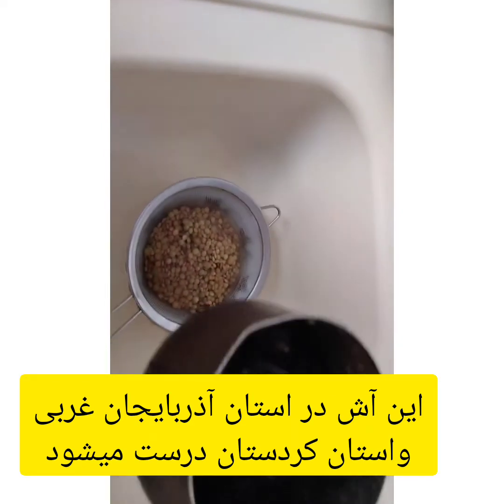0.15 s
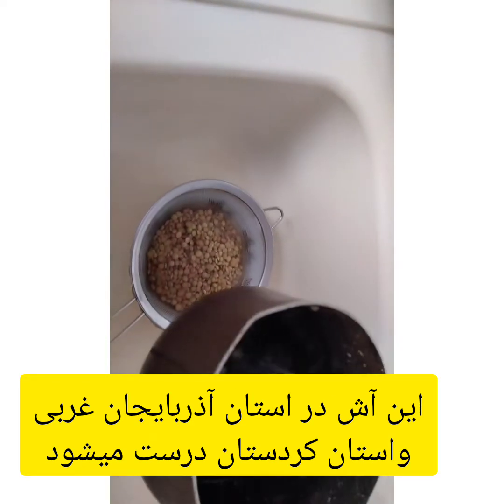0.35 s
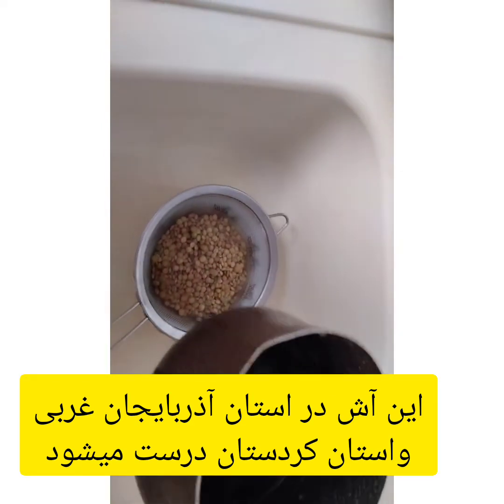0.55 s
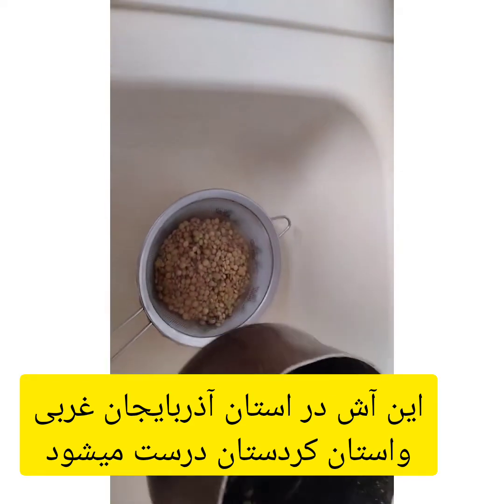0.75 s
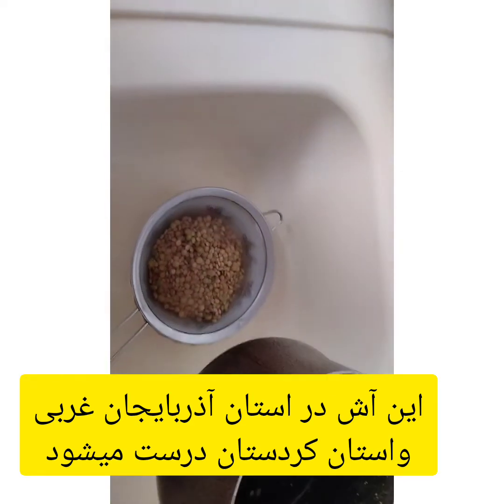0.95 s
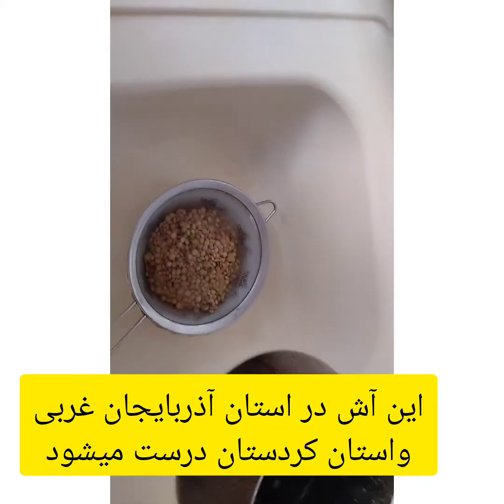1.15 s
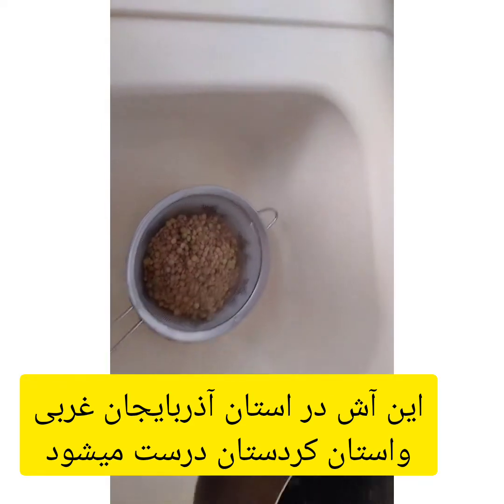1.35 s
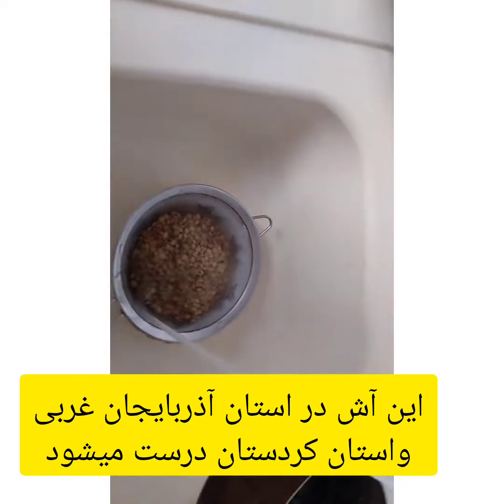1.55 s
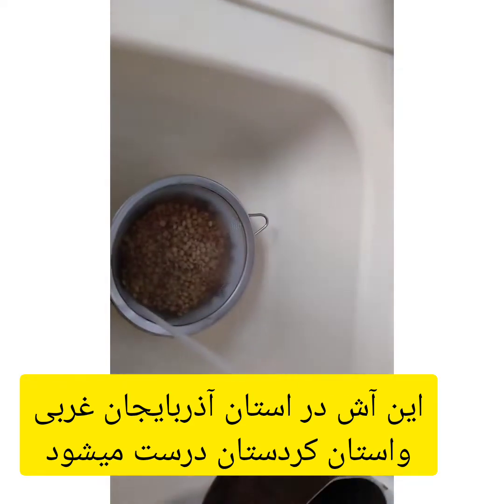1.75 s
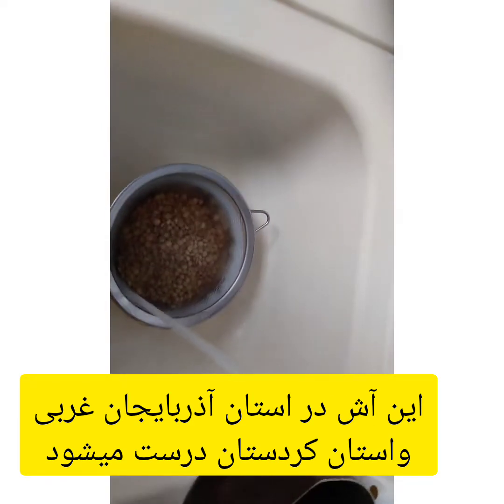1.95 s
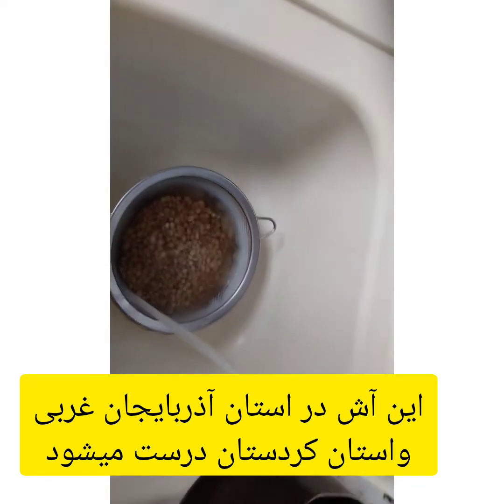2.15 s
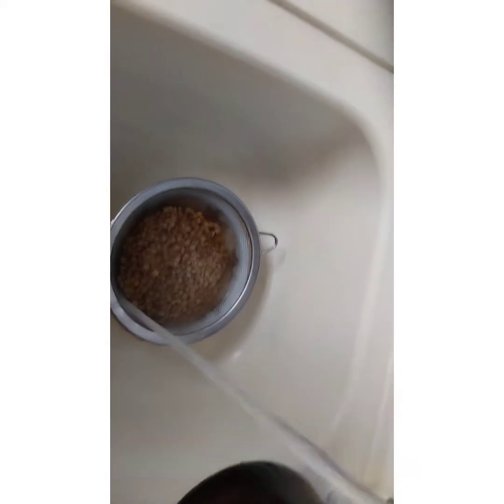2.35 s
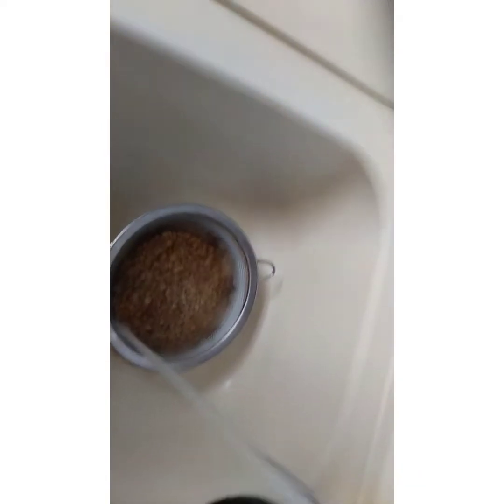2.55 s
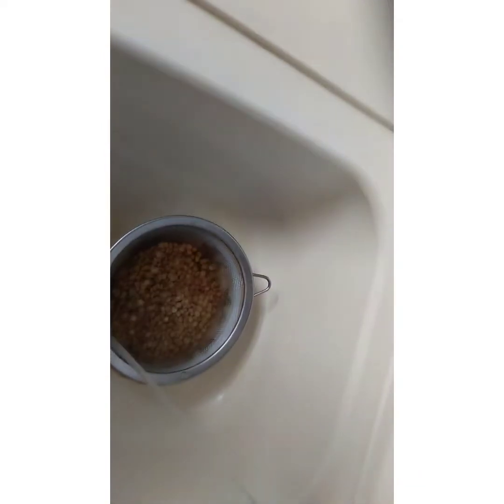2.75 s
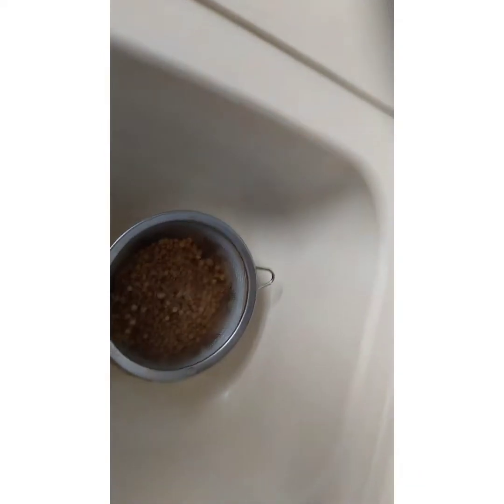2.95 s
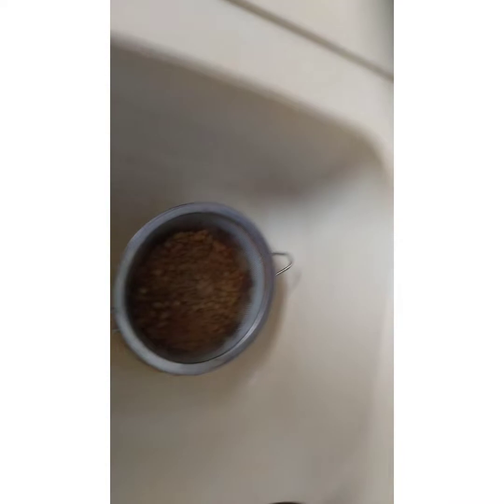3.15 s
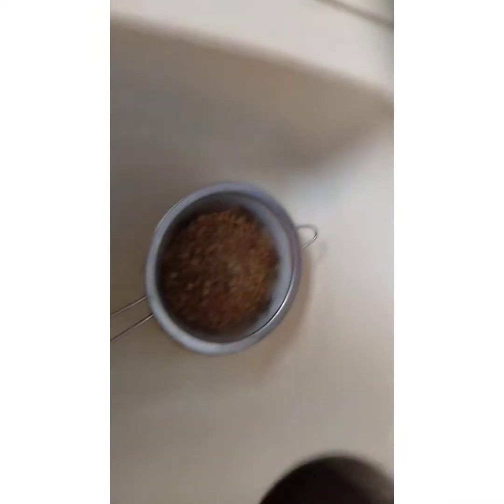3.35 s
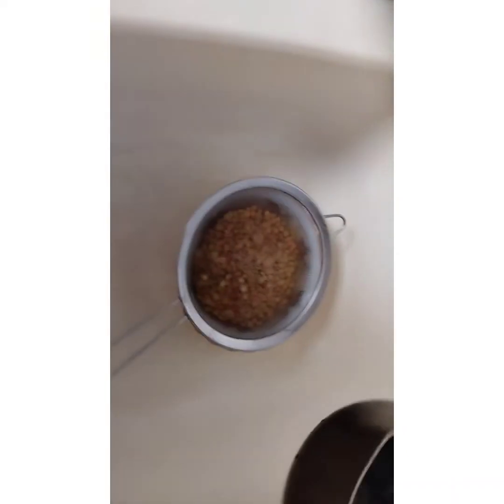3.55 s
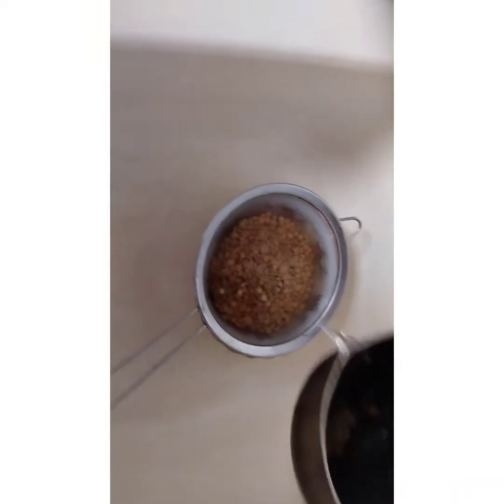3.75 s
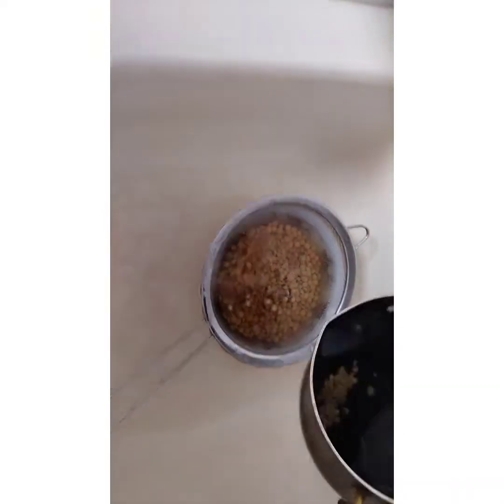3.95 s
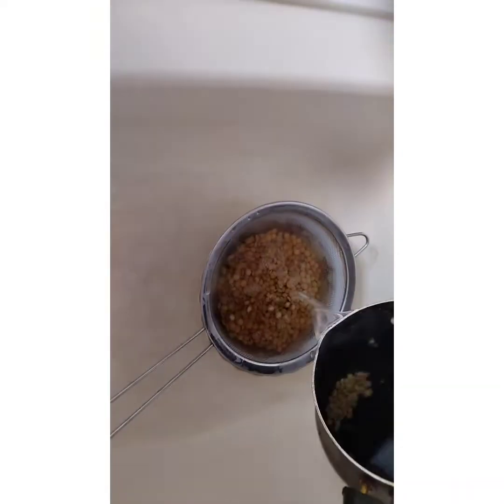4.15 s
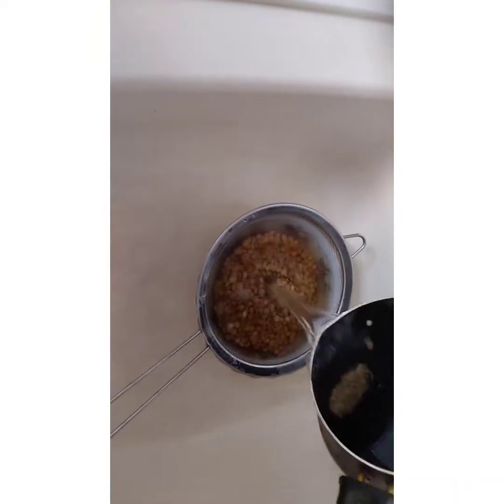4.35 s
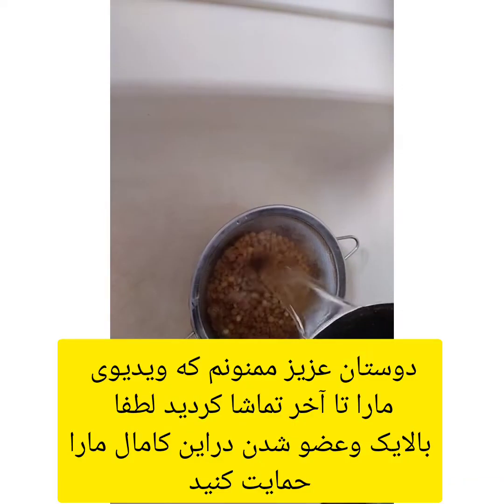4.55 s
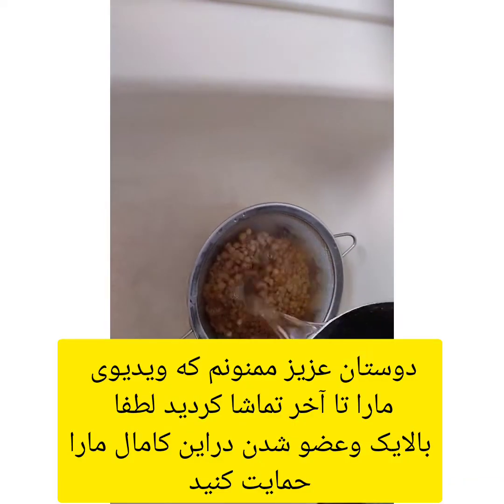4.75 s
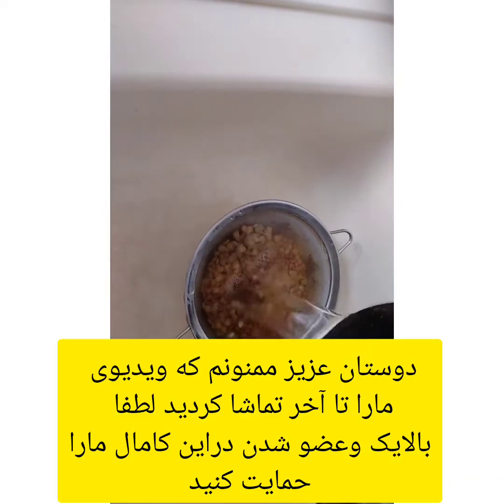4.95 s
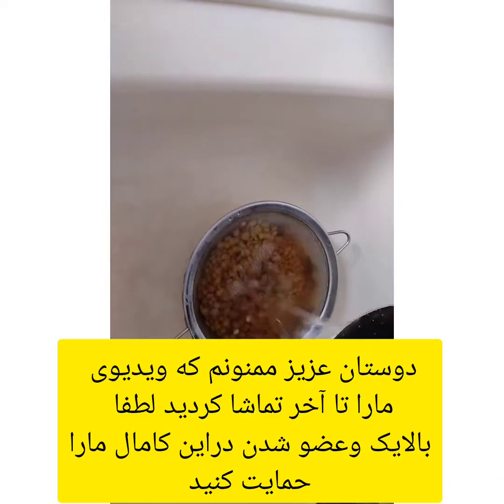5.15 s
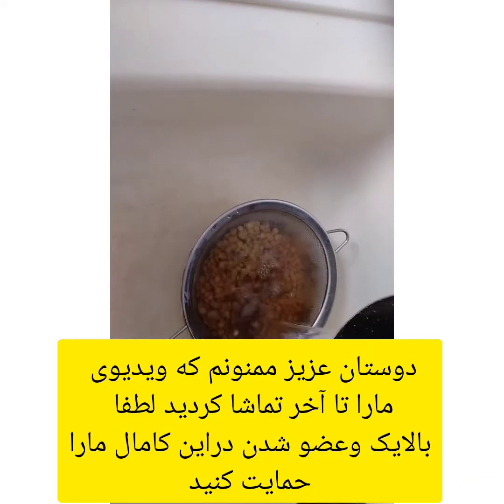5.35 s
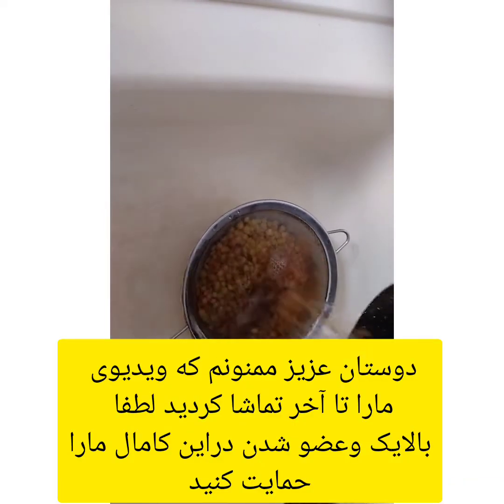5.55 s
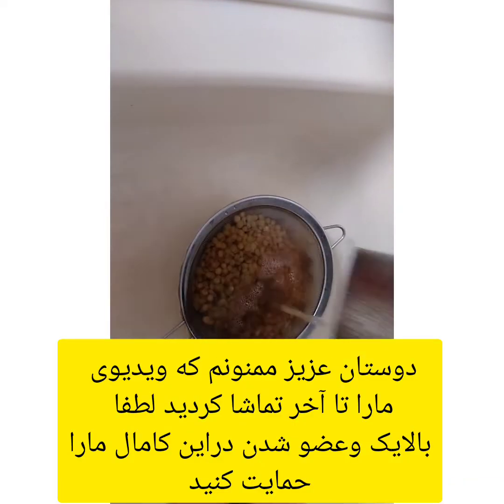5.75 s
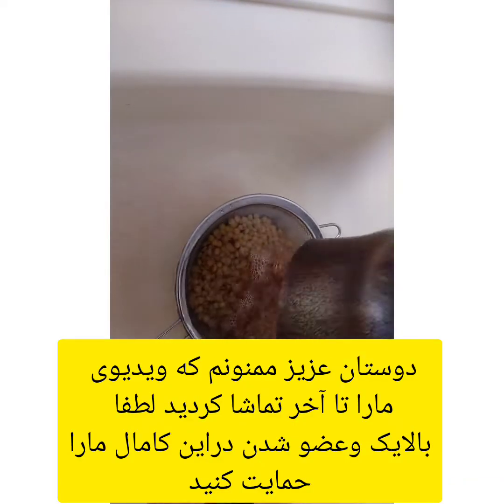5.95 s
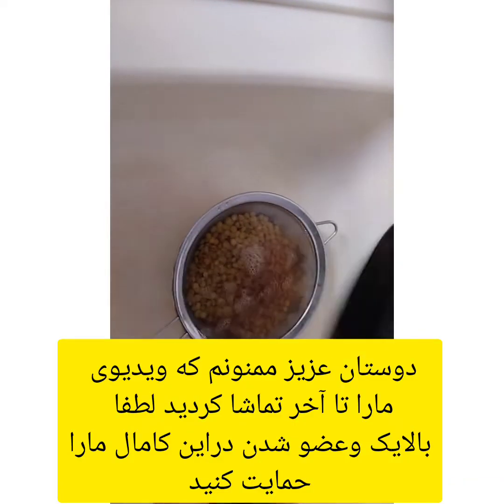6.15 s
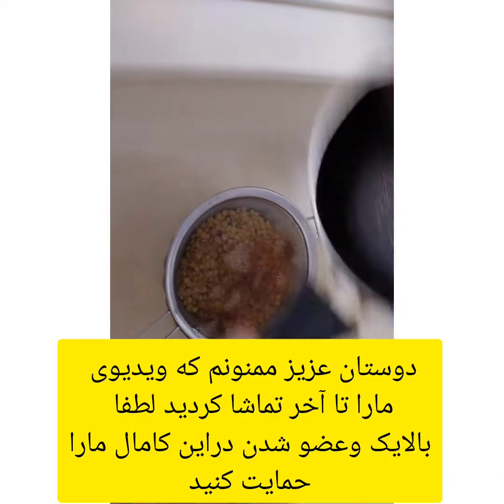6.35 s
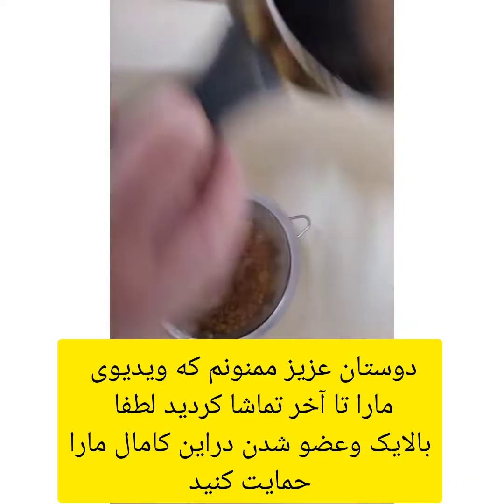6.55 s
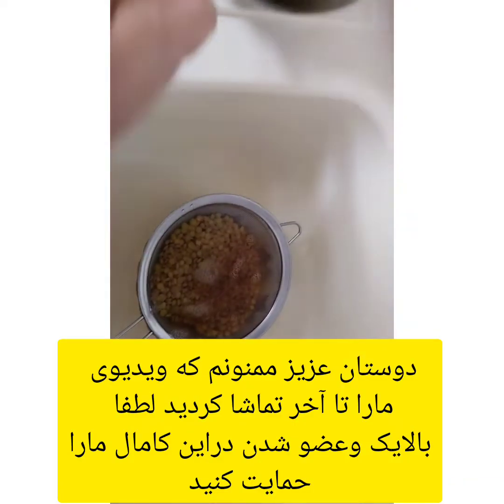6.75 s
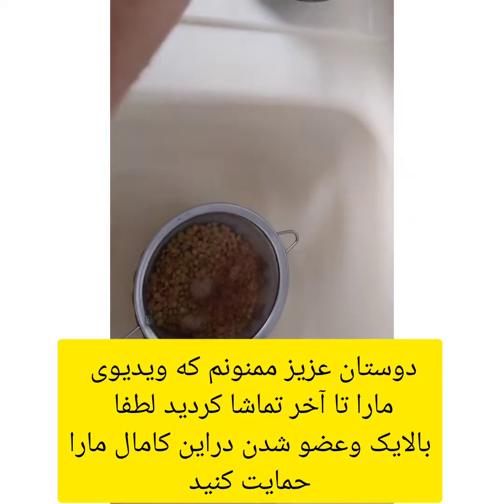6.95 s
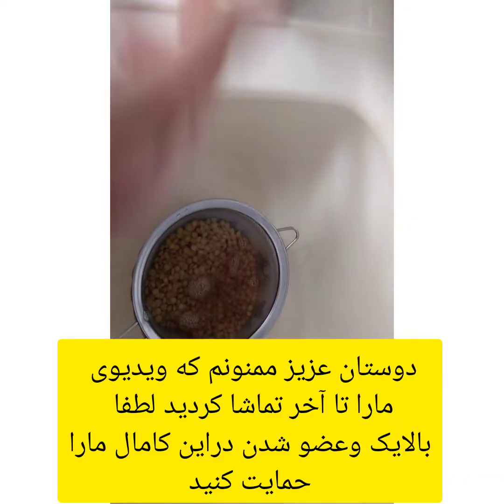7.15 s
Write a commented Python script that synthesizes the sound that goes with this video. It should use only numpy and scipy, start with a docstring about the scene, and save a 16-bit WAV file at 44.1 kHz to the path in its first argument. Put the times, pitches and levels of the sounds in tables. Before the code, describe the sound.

Close mono pickup at a kitchen sink: a running tap fills a metal pot, its fizz fading, then the stream hits the basin as a louder bright hiss with thumps. It cuts off abruptly. A light metallic touch follows, then water patters and trickles over lentils in a strainer, swelling twice with spurts and gulps. The pot lands with a sharp clang; soft thuds end it, fan noise throughout.

```python
"""Tap water is the main source: it fills a small metal pot, then spatters on the floor of a kitchen sink
while the basin is bumped, and is shut off. The pot touches a wire strainer, is emptied over lentils in two
surges, with drips, spurts and gulps, and is set down with a clang. A fan hums throughout. Water is clumped
bursts and rising chirps, metal is ringing modes, contacts are short noise bursts. The place is a basin with
walls a few tenths of a metre apart in a small, hard kitchen; one microphone channel."""
import sys
import numpy as np
from scipy import signal
from scipy.fft import rfft, irfft
from scipy.io import wavfile

SR = 44100
rng = np.random.default_rng(int(sys.argv[2]) if len(sys.argv) > 2 else 0)


def to_wav(s):
    """Save 16-bit WAV."""
    ch = np.atleast_2d(s).T  # columns
    pcm = np.round(np.clip(ch, -1, 1) * 32767)  # PCM
    wavfile.write(sys.argv[1], SR, pcm.astype(np.int16))


N = 321048
TIME = np.arange(N) / SR   # s


def from_db(db):
    """Decibels to gain."""
    return 10 ** (np.asarray(db) / 20)


def rms_one(x):
    """Scale to unit power."""
    return x / np.sqrt(np.mean(x ** 2) + 1e-20)


def between(start, stop, fade):
    """Open from start to stop, with sloping edges (all in s)."""
    opening = np.clip((TIME - start) / fade + .5, 0, 1)
    closing = np.clip((stop - TIME) / fade + .5, 0, 1)
    return opening * closing


def at_hz(points, hz):
    """Read a table on a log-frequency axis."""
    table = np.array(points)
    return np.interp(np.log(hz), np.log(table[:, 0]), table[:, 1])


def drift(rate):
    """Slow chance with spread 1: noise through two one-pole low-passes at this rate in Hz."""
    step = 20   # computed at every 20th sample, then interpolated
    r = np.exp(-2 * np.pi * rate * step / SR)
    noise = rng.standard_normal(N // step + 2002)
    slow = signal.lfilter([1], [1, -2 * r, r * r], noise)[2000:]   # skip the run-in
    return np.interp(np.arange(N) / step, np.arange(len(slow)), rms_one(slow))


def white():
    """White noise."""
    return rng.standard_normal(N)


def coloured(spectrum, source):
    """Give a source this spectrum, falling steeply beyond its ends; rms 1."""
    hz = np.fft.rfftfreq(N, 1 / SR) + 1
    low_end = np.minimum(hz / spectrum[0][0], 1) ** 3
    high_end = np.minimum(spectrum[-1][0] / hz, 1) ** 3
    gain = from_db(at_hz(spectrum, hz)) * low_end * high_end
    return rms_one(irfft(rfft(source()) * gain, N))


def ring(x, hz, t60):
    """A unit click sets a sine of height 1 ringing; it falls 60 dB in t60 s."""
    r = from_db(-60 / (t60 * SR))
    w = 2 * np.pi * hz / SR
    return signal.lfilter([0, np.sin(w)], [1, -2 * r * np.cos(w), r * r], x + 1e-18)


def add(track, s, sound):
    """Mix a short sound in at time s."""
    i = round(s * SR)
    track[i:i + len(sound)] += sound[:N - i]


# edges of third-octave bands: f/Hz
BAND_EDGES = np.geomspace(22, 17000, 30)


def bands(low_hz, high_hz):
    """Third-octave filters that overlap a range."""
    return [signal.butter(2, [a, b], "band", fs=SR, output="sos")
            for a, b in zip(BAND_EDGES, BAND_EDGES[1:]) if b > low_hz and a < high_hz]


def spatter(spectrum, per_s, size_db, clump_db, clump_hz, mist):
    """Tiny bursts, per_s in each band, come in clumps over a mist too fine to count; rms 1."""
    def bursts():
        out = 0
        for sos in bands(spectrum[0][0], spectrum[-1][0]):
            draw = rng.uniform(-1, 1, N) * SR / per_s
            born = np.flatnonzero(np.abs(draw) < 1)
            # many small bursts, few large ones
            size = from_db(-size_db * np.log(np.abs(draw[born]) + .02))
            clicks = np.zeros(N)
            clicks[born] = np.sign(draw[born]) * size
            out = out + signal.sosfilt(sos, rms_one(clicks) + 1e-9)
        return out + mist * white()
    return rms_one(coloured(spectrum, bursts) * from_db(clump_db * drift(clump_hz)))


def chirp(hz, t60, rise):
    """A dying sine that goes up in pitch, as a bubble does when it nears the surface."""
    t = TIME[:SR // 10]
    own_hz = hz * (1 + rise * np.minimum(t / t60, 1))
    phase = 2 * np.pi * np.cumsum(own_hz) / SR
    onset = 1 - np.exp(-t * hz)
    return np.sin(phase) * from_db(-60 * t / t60) * onset


def trickle(count, low_hz, high_hz, size_db, cycles):
    """Small bubbles of random pitch ring and rise; rms 1."""
    out = np.zeros(N)
    for when, pitch, size in rng.random((count, 3)):
        hz = low_hz * (high_hz / low_hz) ** pitch
        gain = from_db(size_db * size ** 2)
        add(out, when * TIME[-1], gain * chirp(hz, cycles / hz, rise=0.1))
    return rms_one(out)


def struck(blows, modes):
    """Blows ring the modes of a body; a soft contact misses the high ones."""
    s, blow_db, corner_hz = np.transpose(blows)
    out = np.zeros(N)
    for k, (hz, mode_db, t60) in enumerate(modes):
        clicks = np.zeros(N)
        softness = 1 + (hz / corner_hz) ** 2
        clicks[np.round(s * SR).astype(int)] = from_db(blow_db + mode_db) / softness
        out += ring(clicks, hz, t60) * (-1) ** k   # neighbouring modes in opposite phase
    return out


def thuds(blows, spectrum, decay_s):
    """Each contact sets off a burst of dense, quickly dying vibration, duller when it is soft."""
    out, t, noise = np.zeros(N), TIME[:SR // 5], coloured(spectrum, white)
    for s, db, corner_hz in blows:
        burst = noise[round(s * SR):][:len(t)]
        dying = burst * np.exp(-t[:len(burst)] / decay_s)
        soft = signal.butter(1, min(corner_hz, SR / 3), fs=SR, output="sos")
        add(out, s, from_db(db) * signal.sosfilt(soft, dying))
    return out


def echoes(x, trips, t60_table):
    """Sound circles between facing walls and loses a little on each trip; unit power gain."""
    size = 2 * SR
    hz = np.fft.rfftfreq(size, 1 / SR)
    t60, response = at_hz(t60_table, hz + 1), 0
    for k, trip in enumerate(trips):
        loss = from_db(-60 * trip / t60)
        delay = np.exp(-2j * np.pi * hz * round(trip * SR) / SR)
        loop = loss * delay * (-1) ** k
        response = response + loop / (1 - loop)
    for trip in trips[:3]:   # clutter smears every echo
        lag = np.exp(-2j * np.pi * hz * round(trip * SR / 5) / SR)
        response = response * (lag - .5) / (1 - .5 * lag)
    impulse = irfft(response, size)[:SR]
    return signal.fftconvolve(x, impulse / np.linalg.norm(impulse))[:N]


# air noise of the fan: f/Hz, level/dB
FAN_AIR = [(24, 6), (60, -3.5), (110, -7.5), (160, -11.5), (260, -12.5), (370, -3), (520, -13), (720, -14),
           (1100, -18), (2400, -26.5), (6200, -28), (8900, -17.5), (11500, -26.5), (15500, -34.5)]
# droning resonances of the fan housing: f/Hz, level/dB, width/Hz
FAN_HUM = [(105.1, -60, 15.5), (197.5, -68.5, 4.5), (396, -63, 5), (431, -65, 32), (480, -74.5, 3.5),
           (585, -63.5, 11), (650.5, -71.5, 18), (1956, -75.5, 51), (7100, -73.5, 400)]
# faint motor tones: f/Hz, level/dB
MOTOR_TONES = [(587, -62.5), (2590, -81)]


def fan():
    """Steady air noise, a housing droning at its resonances and faint, slightly wandering motor tones."""
    air = from_db(-56.5) * coloured(FAN_AIR, white)
    hum = 0
    for hz, db, width in FAN_HUM:
        t60 = np.log(1000) / (np.pi * width)
        hum = hum + from_db(db) * rms_one(ring(white(), hz, t60))
    turns = np.cumsum(1 + 0.00197 * drift(2.3)) / SR
    tones = sum(from_db(db) * rms_one(np.sin(2 * np.pi * hz * turns)) for hz, db in MOTOR_TONES)
    return air + hum + tones


# stream into the pot: f/Hz, level/dB
FILL_SPECTRUM = [(560, -48), (950, -18), (1660, -8), (2280, -9), (2480, -4), (3020, -12), (4390, -15.5),
                 (8740, -2), (12000, -11.5), (15500, -17.5)]
# ring of the filling pot: f/Hz, level/dB, t60/s
FILL_MODES = [(856, -11.5, 0.061), (1640, -14, 0.015), (1870, -24, 0.045), (2525, -13, 0.04),
              (2700, -31, 0.069)]
# level at first, and its fall as the deepening water cushions the stream
FILL_DB, FILL_FALL_DB_PER_S = -43, 5.5
FILL_END_S = 1.25   # wall and gurgle stop
JET_ON_S, JET_OFF_S = 1.387, 2.803   # the stream is on the sink floor


def filling():
    """The stream fizzes and gurgles in the pot and keeps its wall ringing."""
    fizz = spatter(FILL_SPECTRUM, per_s=300, size_db=4.0, clump_db=3.0, clump_hz=50, mist=1.0)
    fizz_db = FILL_DB - FILL_FALL_DB_PER_S * TIME
    wall = sum(from_db(db) * rms_one(ring(white(), hz, t60)) for hz, db, t60 in FILL_MODES)
    gurgle = trickle(count=220, low_hz=598, high_hz=1095, size_db=12, cycles=21)
    # the tap is already running at the start
    inside = (from_db(-49.5) * wall + from_db(-61.5) * gurgle) * between(-1, FILL_END_S, fade=0.11)
    return from_db(fizz_db) * fizz * between(-1, JET_ON_S, fade=0.031) + inside


# quick clusters of chirps, high for spurts of spray, low for gulps of air:
# t/s, level/dB, f/Hz, length/s
SPURTS_AND_GULPS = [(0.021, -26, 6100, 0.046), (.492, -25.5, 7500, 0.048), (0.631, -25, 7900, 0.041),
                    (0.837, -35, 4000, 0.033), (1.385, -20.5, 9300, 0.024), (2.778, -24, 4600, .02),
                    (2.816, -26.5, 8800, .014), (4.361, -43, 2930, 0.017), (4.518, -37, 1510, .014),
                    (4.984, -43.5, 1650, 0.024), (5.572, -35, 2680, 0.018), (5.831, -38.5, 1134, 0.03)]


def spurts_and_gulps(spread, cycles, count):
    """A spurt of spray or a gulp of air is a quick cluster of small chirps of about the same pitch."""
    out = np.zeros(N)
    for s, db, hz, length in SPURTS_AND_GULPS:
        for k, (when, pitch) in enumerate(rng.random((count, 2))):
            own_hz = hz * np.exp(spread * (2 * pitch - 1))
            own_s = s + length * (k + when) / count
            add(out, own_s, from_db(db) * chirp(own_hz, cycles / own_hz, rise=0.1))
    return out


# single drops, mostly small bright spray ticks, a few lower plops: t/s, level/dB (relative), pitch f/Hz
SINGLE_DROPS = [(.1045, -25, 8600), (0.34, -24.5, 8700), (.817, -23, 8740), (2.295, -29.5, 8650),
                (2.7867, -20, 8200), (2.823, -24.5, 9060), (3.242, -37.5, 8500), (3.866, -37.5, 3610),
                (4.258, -33.5, 8400), (4.3215, -25.5, 8040), (4.387, -25, 8350), (4.508, -27, 3470),
                (4.5205, -18, 7950), (4.7336, -25, 7930), (4.953, -27, 9000), (4.9905, -29, 9060),
                (5.431, -26, 9000), (5.4698, -26.5, 3290), (5.568, -29, 1600), (5.8123, -31, 8540),
                (5.8927, -35.5, 2330), (6.0193, -39, 11800), (6.466, -39, 8600)]
SPLASH_DB = -5.5   # splash of a drop, relative to its chirp


def drops(cycles, rise, swell_s, splash_s):
    """Each drop is a short splash of noise and a rising chirp that rings for a set number of cycles."""
    out, t = np.zeros(N), TIME[:SR // 10]
    spray = coloured(POUR_SPECTRUM, white)
    shape = (1 - np.exp(-t / swell_s)) * np.exp(-t / splash_s) * from_db(SPLASH_DB)
    for s, db, hz in SINGLE_DROPS + stray_drops(count=10):
        splash = spray[round(s * SR):][:len(t)] * shape
        add(out, s, from_db(db) * (chirp(hz, cycles / hz, rise) + splash))
    return out


# sharp snaps of bursting droplets: t/s, level/dB, contact corner f/Hz
SNAP_EVENTS = [(.3665, -26, 14000), (.4545, -22.5, 14000), (.8625, -30, 14000), (2.777, -20, 9000),
               (5.431, -45, 11900), (5.784, -42, 12000), (5.8335, -35, 9000)]
# colour of a snap: f/Hz, level/dB
SNAP_SPECTRUM = [(4000, -17), (9000, 6), (12000, -1), (15500, -3)]


def snaps():
    """Bursting droplets give very short bright bursts of noise."""
    return thuds(SNAP_EVENTS, SNAP_SPECTRUM, decay_s=0.0029)


# spray on the sink floor: f/Hz, level/dB
JET_SPECTRUM = [(530, -27), (900, -16), (1580, -18.5), (1880, -12), (2250, -15), (2600, -9), (3070, -12),
                (3420, -9), (4130, -8), (6120, -8), (8650, 2.5), (11400, -8), (15500, -15.5)]
# basin drumming under the jet: f/Hz, level/dB
DRUM_SPECTRUM = [(50, -4), (105, 3), (170, -20), (250, -16), (340, -6.5), (450, -2.5), (600, -41),
                 (1000, -19)]
JET_DB, WOBBLE_DB, WOBBLE_HZ = -38, 1.0, 19   # steady level, and the wobble of the stream
CHOKE_DB, CHOKE_S = -3.5, 0.24   # the stream thins as the tap is closed


def jet():
    """The wobbling stream breaks up on the sink floor, which drums under it."""
    spray = spatter(JET_SPECTRUM, per_s=1800, size_db=5.0, clump_db=3.0, clump_hz=81, mist=0.84)
    drum = from_db(-53.0) * coloured(DRUM_SPECTRUM, white)
    closing = np.clip(1 - (JET_OFF_S - TIME) / CHOKE_S, 0, 1)
    flow_db = JET_DB + WOBBLE_DB * drift(WOBBLE_HZ) + CHOKE_DB * closing
    return (from_db(flow_db) * spray + drum) * between(JET_ON_S, JET_OFF_S, fade=0.004)


# dull scuffs while things are handled: t/s, level/dB (relative), contact corner f/Hz
SCUFF_EVENTS = [(1.467, -41, 500), (2.506, -34.5, 2500), (2.523, -38, 1200), (2.585, -45, 400),
                (6.925, -50, 3010), (7.065, -43, 500), (7.113, -48.5, 4000)]
# colour of a scuff: f/Hz, level/dB
SCUFF_SPECTRUM = [(120, -8.5), (330, 6), (600, -2), (850, -3.5), (1100, -19), (1500, -2.5), (2200, -33)]


def scuffs():
    """Handling gives short, dull bursts of noise."""
    return from_db(-1.0) * thuds(SCUFF_EVENTS, SCUFF_SPECTRUM, decay_s=0.017)


# bumps on the basin: t/s, level/dB (relative), contact corner f/Hz
BUMP_EVENTS = [(1.527, -18, 2500), (1.637, -20.5, 3000), (1.68, -19.5, 198), (2.588, -28.5, 130),
               (3.115, -38.5, 150), (3.252, -33.5, 150), (6.92, -33.5, 203), (6.96, -36.5, 201),
               (7.035, -37, 196)]
# basin modes: f/Hz, level/dB (relative), t60/s
BASIN_MODES = [(76, -23, 0.091), (110, 2, 0.1), (126.8, 0.5, .13), (194.4, -7.5, 0.24), (281, -8.5, 0.11),
               (390, -32, 0.042), (577, -15.5, 0.19), (713, -5.5, 0.033), (1015, -12, 0.33),
               (1206, -12.5, 0.13), (1710, -20.5, 0.14), (2030, -8, 0.036), (2630, -11.5, 0.047),
               (3050, -10, .05)]
# dull body of a bump: f/Hz, level/dB
THUD_SPECTRUM = [(45, 2), (100, 10), (200, 0.5), (350, 2), (480, -10.5), (750, -8.5), (1300, -6.5),
                 (2800, -12.5), (5000, -9)]


def basin_bumps():
    """Each bump rings the modes of the basin and adds a dull body of noise."""
    body = from_db(-10.5) * thuds(BUMP_EVENTS, THUD_SPECTRUM, decay_s=0.029)
    return from_db(0.5) * struck(BUMP_EVENTS, BASIN_MODES) + body


# the pot touches the strainer rim: t/s, level/dB (relative), contact corner f/Hz
RIM_TOUCHES = [(3.702, -47, 7000), (3.728, -54, 14000), (3.7365, -34, 3500)]
# strainer modes: f/Hz, level/dB (relative), t60/s
STRAINER_MODES = [(1140, -30, 0.02), (1720, -12, 0.051), (2310, -12, 0.081), (2524, 3.5, 0.047),
                  (2645, 1, 0.055), (2910, 7.5, 0.022)]
# the full pot's lowest mode bends as its water sloshes: t/s, f/Hz, level/dB (relative)
SLOSH_NOTE = [(3.735, 916, -70), (3.74, 866, -43.5), (3.78, 724, -58), (3.87, 830, -64)]
# pot wall sliding along the rim: f/Hz, level/dB
SCRAPE_SPECTRUM = [(1500, -6), (4500, -4), (6000, -7), (8600, 1), (14000, -20)]
# crack of a contact, here and at the landing: f/Hz, level/dB
CRACK_SPECTRUM = [(300, -8), (800, 12.5), (1500, -25), (3000, -23), (5000, -17.5), (7000, -7.5),
                  (10000, -7), (15000, -24.5)]


def pot_on_strainer():
    """A short scrape and a light clack, then the pot's note wavers with the water in it."""
    s, hz, db = np.transpose(SLOSH_NOTE)
    phase = 2 * np.pi * np.cumsum(np.interp(TIME, s, hz)) / SR
    note = np.sin(phase) * from_db(np.interp(TIME, s, db)) * between(s[0], s[-1], fade=.005)
    sliding = between(RIM_TOUCHES[0][0], RIM_TOUCHES[-1][0] + 0.016, fade=0.014)
    scrape = from_db(-51 + 3.7 * drift(120)) * coloured(SCRAPE_SPECTRUM, white) * sliding
    crack = from_db(-12.5) * thuds(RIM_TOUCHES, CRACK_SPECTRUM, decay_s=0.01)
    return from_db(-0.5) * (struck(RIM_TOUCHES, STRAINER_MODES) + scrape + note) + crack


STRAY_DROP_DB, STRAY_SPREAD_DB = -34, 1   # level before the mix, like the single drops
STRAY_LOW_HZ, STRAY_HIGH_HZ = 7600, 9400   # range of their pitch
POUR_START_S, POUR_END_S = 4.21, 5.92


def stray_drops(count):
    """Small drops fall beside the stream throughout the pour: rows of (t/s, level/dB, pitch f/Hz)."""
    slot_s = (POUR_END_S - POUR_START_S) / count
    rows = []
    for k, (when, size, pitch) in enumerate(rng.random((count, 3))):
        s = POUR_START_S + slot_s * (k + when)
        db = STRAY_DROP_DB + STRAY_SPREAD_DB * (2 * size - 1)
        rows.append((s, db, STRAY_LOW_HZ * (STRAY_HIGH_HZ / STRAY_LOW_HZ) ** pitch))
    return rows


# the pot is tipped further and the flow surges: t/s at the crest, level/dB (relative)
POUR_TIPS = [(4.47, -55.5), (5.69, -50)]
TIP_RISE_S, TIP_FALL_S = 0.17, 0.16   # time for a surge to grow or shrink by a factor e
DRIBBLE_DB = -61


def pour_flow():
    """A dribble that swells and ebbs with each tip of the pot."""
    surges = 0
    for s, db in POUR_TIPS:
        slope = np.minimum((TIME - s) / TIP_RISE_S, (s - TIME) / TIP_FALL_S)
        surges = surges + from_db(db) * np.exp(slope)
    return (from_db(DRIBBLE_DB) + surges) * between(POUR_START_S, POUR_END_S, fade=0.037)


# water on the lentils, also the splash of each drop: f/Hz, level/dB
POUR_SPECTRUM = [(590, -18), (1000, -19), (1220, -6.5), (1600, -19.5), (1730, -9.5), (2110, -18),
                 (3260, -10), (5400, -9), (8060, 0.5), (15500, -16.5)]


def pouring():
    """Water patters on the lentils and trickles through the mesh."""
    patter = spatter(POUR_SPECTRUM, per_s=240, size_db=3.5, clump_db=7.0, clump_hz=63, mist=0.3)
    bubbles = trickle(count=1000, low_hz=1483, high_hz=8300, size_db=10.5, cycles=44)
    return pour_flow() * (from_db(1.0) * patter + from_db(-8) * bubbles)


# the pot lands and rocks: t/s, level/dB (relative), contact corner f/Hz
LANDING_BLOWS = [(6.6365, -0.5, 12000), (6.6445, -19.5, 2000), (6.692, -18.5, 4000), (6.744, -17.5, 1000)]
# pot on the worktop: f/Hz, level/dB (relative), t60/s
POT_MODES = [(106, -32, 0.46), (119.8, -34, 0.36), (196.6, -33.5, 0.3), (372, -32, 0.246),
             (633, -13.5, 0.12), (673, -18, 0.099), (744, -19.5, 0.061), (808, -15, 0.064),
             (940, -39, 0.11), (1000, -25, 0.055), (1192, -17, 0.076), (1231.3, -20, 0.35),
             (1293, -23.5, 0.087), (1805, -34, .1), (1950, -31, 0.084), (2133, -20, 0.16),
             (3445, -35, 0.11), (3765, -33, 0.067), (4950, -24.5, 0.067), (5060, -30, 0.066),
             (6790, -19, 0.035), (7100, -23, 0.044)]
# worktop shaking under the pot: f/Hz, level/dB
RATTLE_SPECTRUM = [(150, -17), (310, -4), (480, -10), (680, 1.5), (950, 3), (1300, -4), (1550, -32),
                   (2300, -21.5), (4000, -36)]


def pot_landing():
    """A sharp crack, the pot's own ring and a dense rattle of the worktop."""
    crack = from_db(-7.5) * thuds(LANDING_BLOWS, CRACK_SPECTRUM, decay_s=0.0076)
    rattle = from_db(-22.5) * thuds(LANDING_BLOWS, RATTLE_SPECTRUM, decay_s=0.044)
    return from_db(3.5) * struck(LANDING_BLOWS, POT_MODES) + crack + rattle


# round trips between the basin walls, some 0.2 to 0.8 m apart: t/s
BASIN_TRIPS = [.0013, .0019, .0023, .0031, .0037, .0047]


def in_sink(x, wet_db, t60):
    """The close walls of the basin throw back a quick flurry of echoes."""
    wet = from_db(wet_db)
    return (x + wet * echoes(x, BASIN_TRIPS, [(1, t60)])) / np.sqrt(1 + wet ** 2)


# round trips across the kitchen: t/s
ROOM_TRIPS = np.geomspace(.011, .053, 16)
# damping of the kitchen: f/Hz, t60/s
KITCHEN_T60 = [(100, 0.82), (700, 0.47), (2000, 0.52), (8000, 0.3), (15000, 0.36)]


def kitchen(x):
    """Reverberation between the room's walls, whose treble dies sooner than its bass."""
    return echoes(x, ROOM_TRIPS, KITCHEN_T60)


def scene():
    """Water and bumps sound in the basin, the pot beside it; the kitchen answers, and the fan hums."""
    clusters = spurts_and_gulps(spread=0.27, cycles=19.8, count=12)
    dripping = from_db(3.5) * drops(cycles=38, rise=0.14, swell_s=0.0017, splash_s=0.0027)
    wet_sources = filling() + clusters + dripping + jet() + pouring()
    water = in_sink(wet_sources, wet_db=-5, t60=0.081) + snaps()
    bumps = scuffs() + basin_bumps()
    clacks = pot_on_strainer()
    pot = pot_landing()
    sent = from_db(-19.5) * (water + clacks) + from_db(-13.5) * bumps + from_db(-11.0) * pot
    return (water + clacks + bumps + pot + kitchen(sent) + fan())[None]


CUTOFF_HZ = 15900


def record(dry):
    """The microphone signal is clipped at full scale, then cut steeply above the cutoff."""
    low_pass = signal.ellip(10, .1, 80, CUTOFF_HZ, fs=SR, output="sos")
    return signal.sosfilt(low_pass, np.clip(dry, -1, 1))


dry = scene()
out = record(dry)
to_wav(out)
```